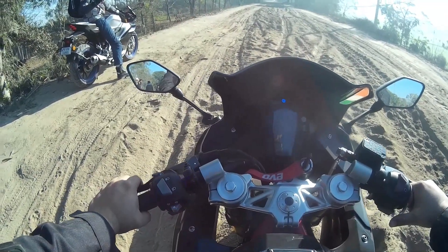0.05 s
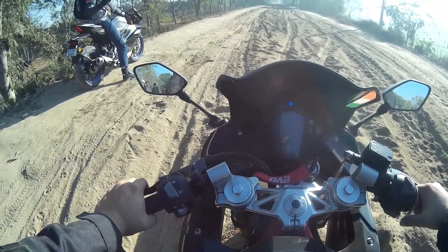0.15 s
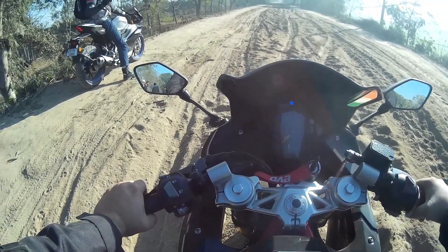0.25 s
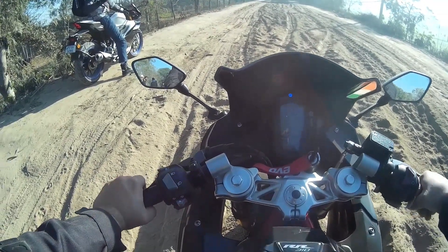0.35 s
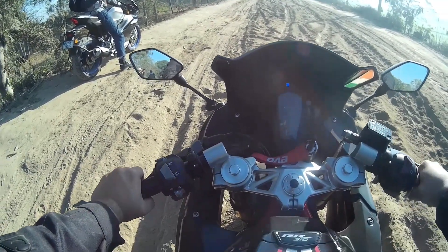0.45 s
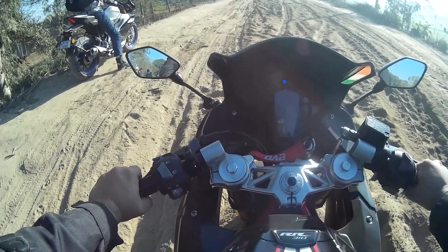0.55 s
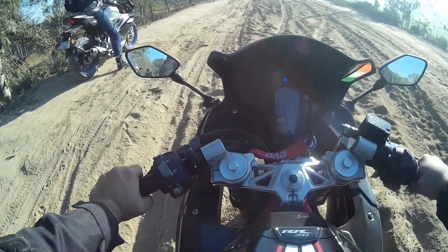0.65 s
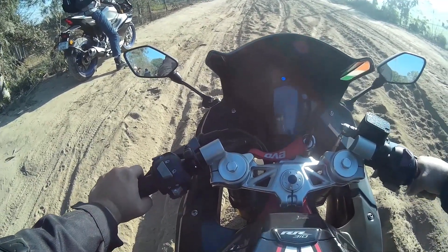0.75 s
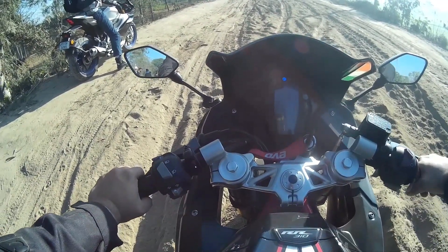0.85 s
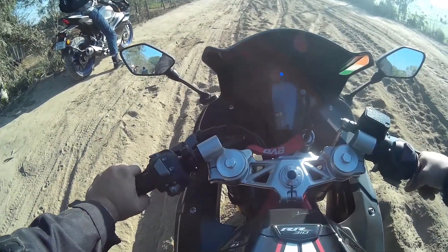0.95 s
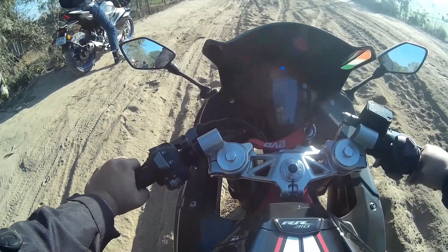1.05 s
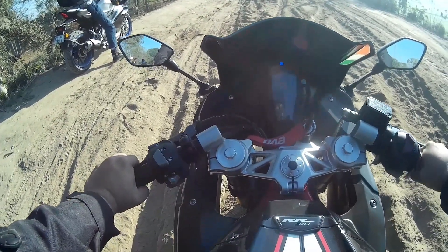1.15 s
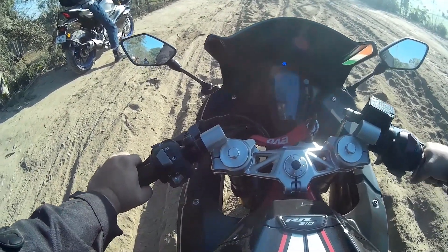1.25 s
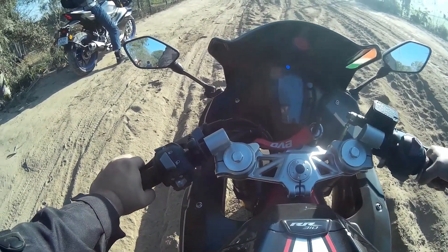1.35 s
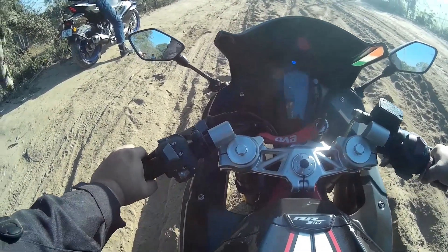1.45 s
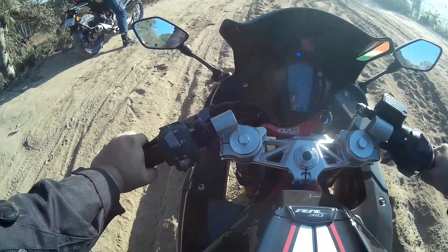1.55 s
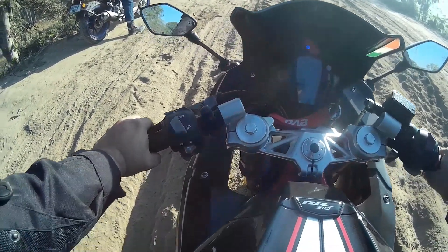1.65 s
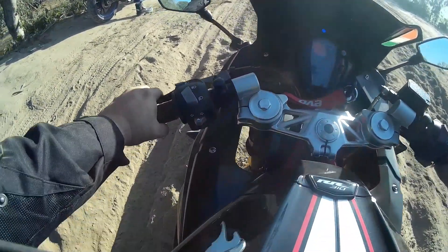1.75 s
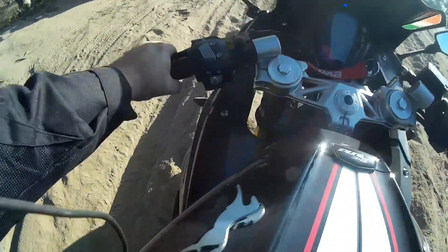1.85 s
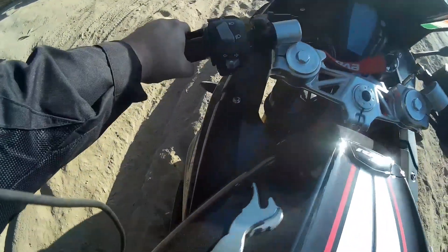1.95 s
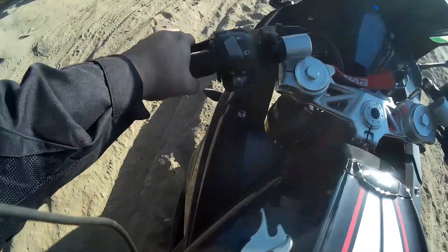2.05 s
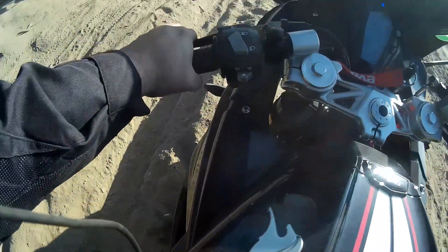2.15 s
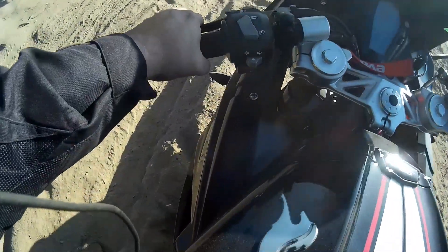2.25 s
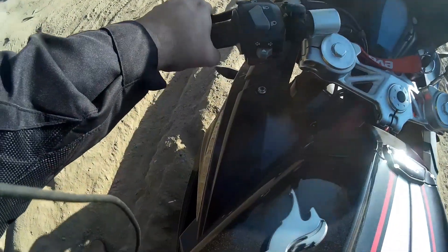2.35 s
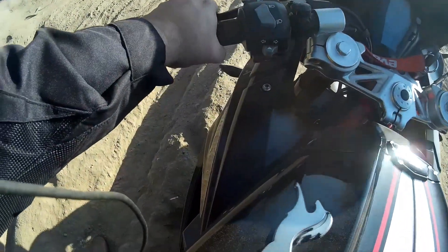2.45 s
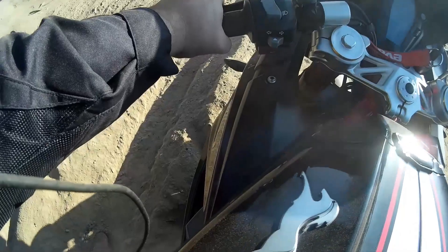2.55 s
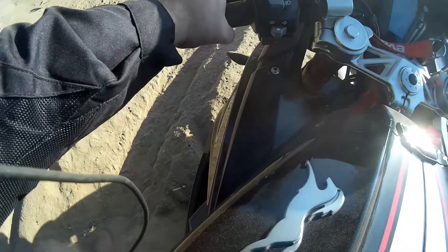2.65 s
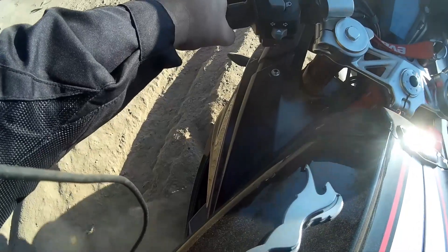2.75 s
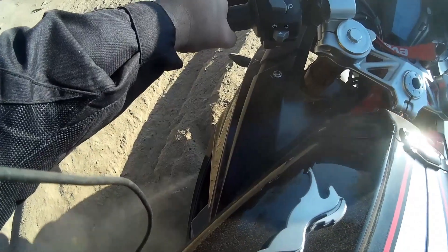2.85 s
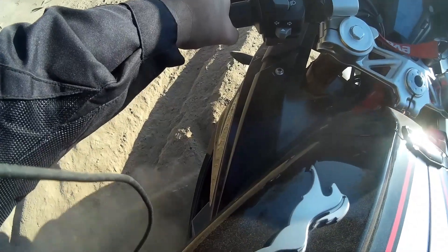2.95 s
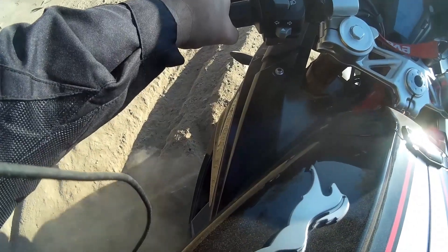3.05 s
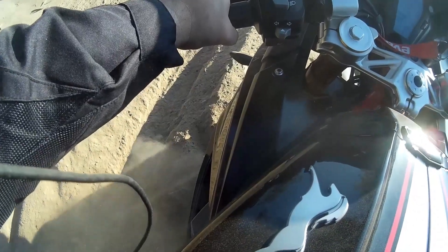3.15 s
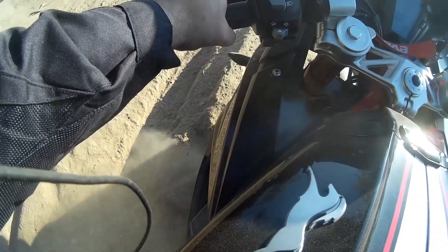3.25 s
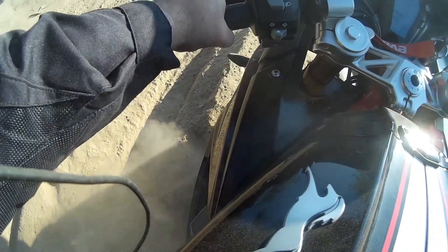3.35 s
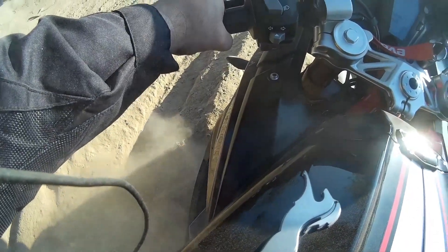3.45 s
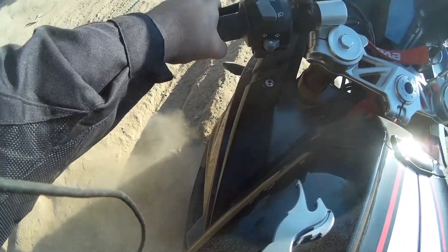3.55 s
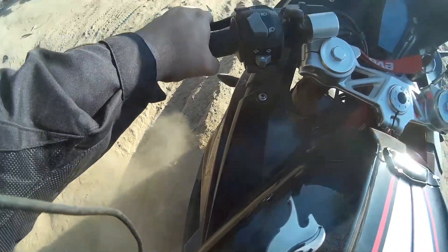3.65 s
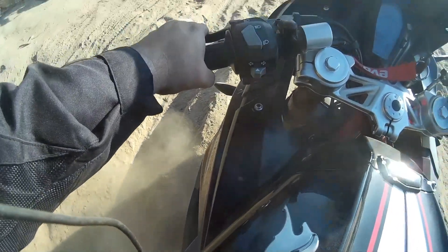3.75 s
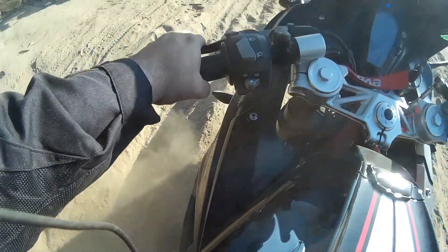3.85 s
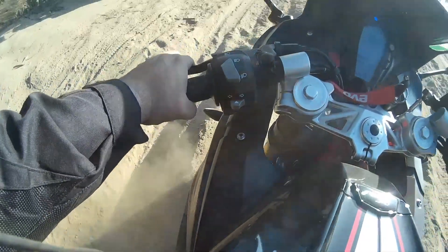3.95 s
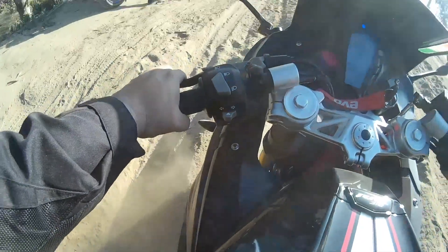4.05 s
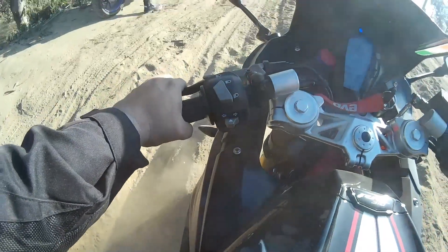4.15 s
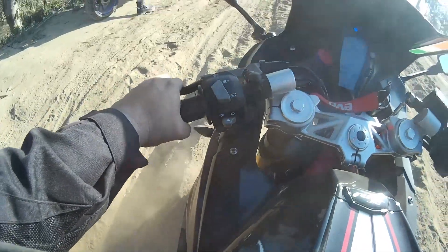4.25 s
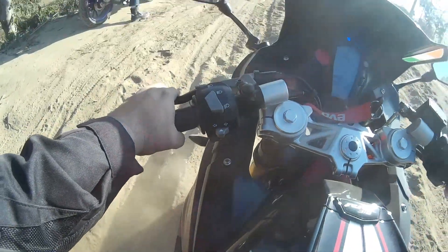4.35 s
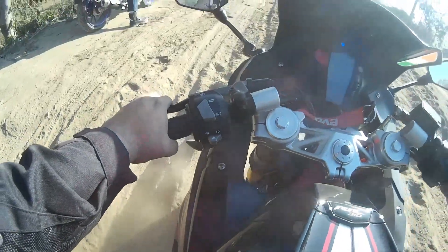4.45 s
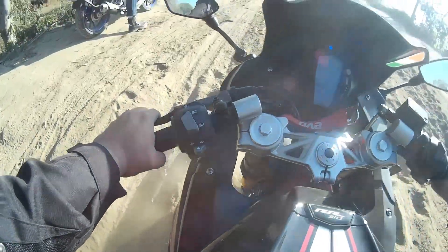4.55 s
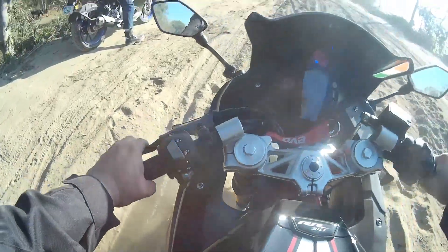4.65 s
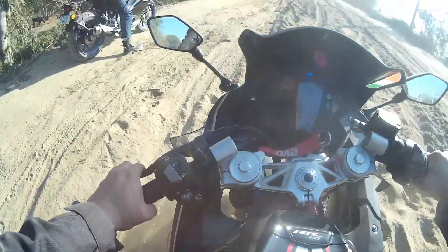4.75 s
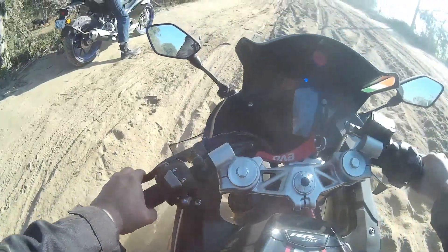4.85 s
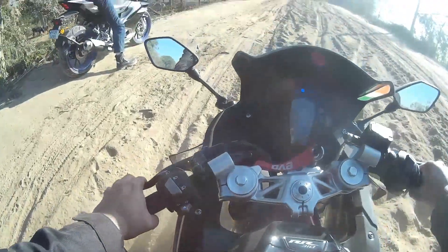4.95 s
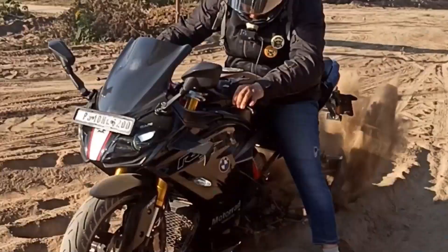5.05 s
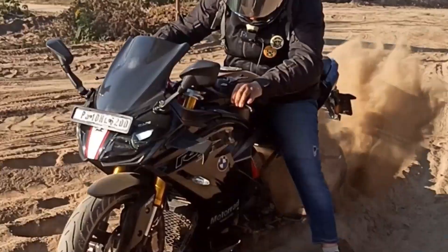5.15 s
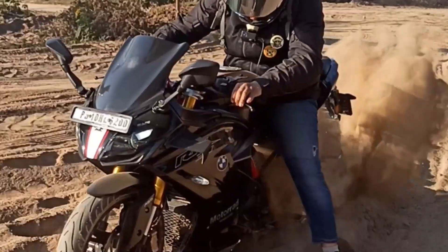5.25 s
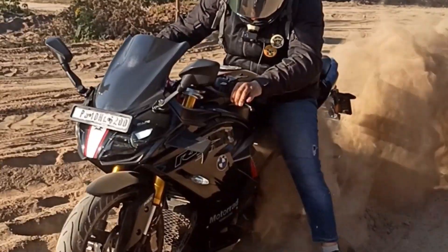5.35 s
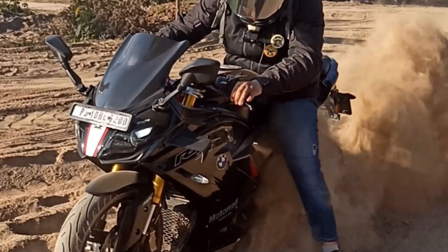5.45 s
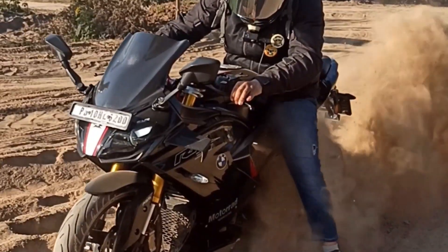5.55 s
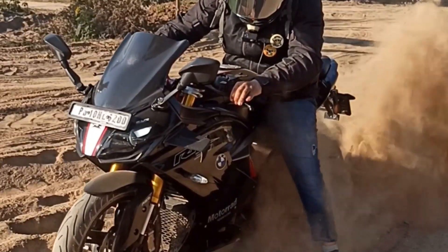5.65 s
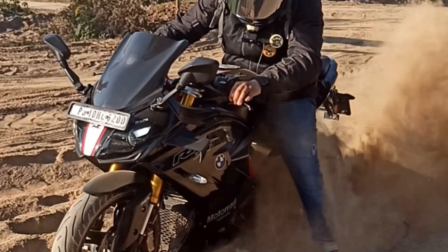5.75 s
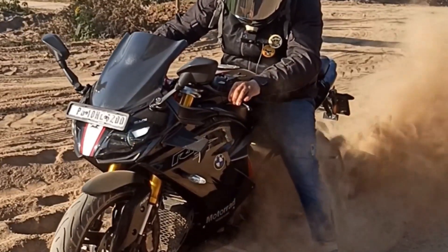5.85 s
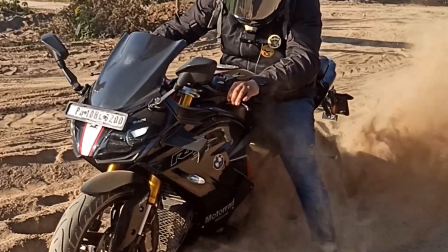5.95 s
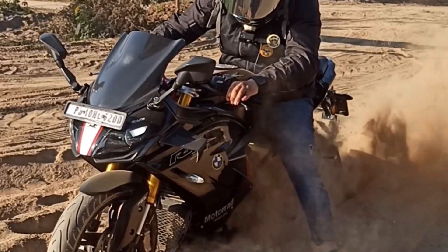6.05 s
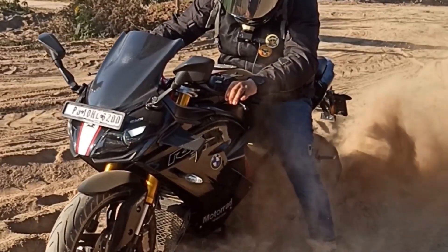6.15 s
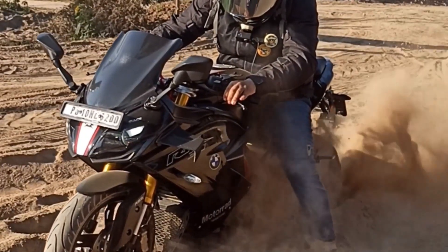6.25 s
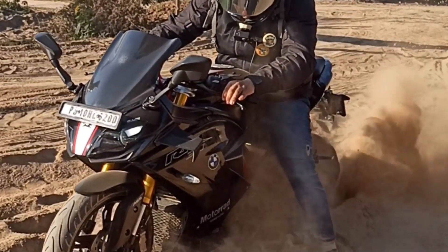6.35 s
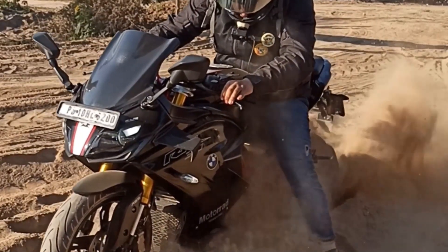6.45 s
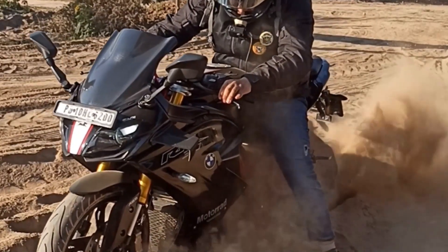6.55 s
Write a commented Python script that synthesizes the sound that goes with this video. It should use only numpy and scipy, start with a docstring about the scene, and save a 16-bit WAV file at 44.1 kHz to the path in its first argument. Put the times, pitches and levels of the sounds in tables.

```python
"""A motorcycle engine idles, muffled, then is revved in stabs; at a cut it turns open and sandy.
The muffled part is heard by a microphone in the rider's helmet. The cut goes to an open microphone in
front, which hears separate exhaust beats, valve clatter and sand sprayed by the spinning rear wheel.
One four-stroke cylinder drives it all: pulses make the beats, crank-locked patterns the knocks,
noise the rumble, rattle, ticks and loose hiss, and sine waves the frame shake, drone and gear whine."""
import sys
import numpy as np
from scipy.fft import rfft, irfft, next_fast_len
from scipy.io import wavfile
from scipy.ndimage import uniform_filter1d, map_coordinates

SR = 44100
rng = np.random.default_rng(int(sys.argv[2]) if len(sys.argv) > 2 else 0)


def to_wav(s):
    """Save 16-bit WAV."""
    ch = np.atleast_2d(s).T  # columns
    pcm = np.round(np.clip(ch, -1, 1) * 32767)  # PCM
    wavfile.write(sys.argv[1], SR, pcm.astype(np.int16))


N = 291060

# Engine speed at each microphone. Each row: time in seconds, firings per second.
HELMET_SPEED = [(0.0, 11.0), (0.2, 12.88), (0.33, 15.07), (0.52, 15.27), (0.64, 20.38), (0.78, 21.64),
                (0.9, 18.39), (1.0, 16.0), (1.1, 17.96), (1.19, 25.35), (1.3, 26.93), (1.55, 26.0),
                (1.6, 31.2), (1.71, 47.2), (1.78, 52.8), (1.85, 54.6), (1.95, 53.1), (2.09, 59.7),
                (2.2, 62.8), (2.28, 63.2), (2.34, 56.4), (2.41, 45.0), (2.48, 40.8), (2.76, 40.6),
                (3.08, 43.7), (3.37, 45.8), (3.53, 49.5), (3.64, 50.7), (3.79, 51.4), (3.9, 53.24),
                (4.0, 53.76), (4.13, 52.65), (4.3, 52.8), (4.69, 54.07), (4.86, 55.83), (5.0, 56.1)]
FRONT_SPEED = [(5.003, 58.8), (5.08, 61.5), (5.2, 63.7), (5.247, 61.9), (5.345, 48.3), (5.41, 41.2),
               (5.5, 40.66), (5.68, 40.55), (5.843, 41.86), (6.083, 44.4), (6.283, 45.7), (6.505, 49.78),
               (6.6, 50.8)]
# How hard the engine works at each microphone, before throttle stabs are added to clatter and hiss.
# Each row: time in seconds, exhaust beat level in dB, casing clatter level in dB, hiss level in dB.
HELMET_EFFORT = [(0.0, -39.5, -39.5, -51.5), (0.45, -35, -38, -50.5), (0.7, -32.5, -34, -46.5),
                 (1.1, -33.5, -37, -48.5), (1.17, -24, -32, -46), (1.3, -31.5, -31.5, -42),
                 (1.55, -30.5, -32.5, -44), (1.63, -17, -25, -39), (1.8, -24.5, -25, -41),
                 (1.93, -22.5, -26, -44.5), (2.1, -20.5, -26.5, -42), (2.23, -19.5, -26, -43.5),
                 (2.33, -27, -27.5, -44.5), (2.38, -42.5, -31, -47.5), (2.44, -29, -34.5, -47),
                 (2.46, -30.5, -26.5, -46.5), (2.56, -27.5, -25, -43), (3.39, -25, -26, -44),
                 (3.6, -24, -24.5, -42), (3.78, -22, -24, -40.5), (3.92, -23.5, -26, -42.5),
                 (4.13, -27.5, -30, -46), (4.61, -27, -28.5, -44), (4.87, -29, -34, -48),
                 (5.0, -26.5, -31, -43.5)]
FRONT_EFFORT = [(5.003, -24.5, -29, -27.5), (5.089, -17, -30.5, -28), (5.2, -22.5, -29, -27),
                (5.25, -24, -29, -26.5), (5.3, -27, -34, -31.5), (5.375, -31, -34, -29.5),
                (5.42, -20, -28, -29), (5.7, -21, -29.5, -29), (6.04, -19, -28.5, -30),
                (6.35, -18, -29.5, -29.5), (6.6, -16.5, -30.5, -27.5)]
# Stabs of the throttle that make the metal bark. Each row: time in seconds, rise in dB.
THROTTLE_STABS = [(0.625, 3), (1.14, 4.5), (1.668, 8.5), (4.0, 3)]
# Tone colours of exhaust beat, frame boom, casing clatter and hiss at each microphone.
# Each row: frequency in Hz, relative level in dB.
HELMET_BEAT_COLOUR = [(20, -28.5), (42, -10), (55, 0), (80, -9.5), (135, -1.5), (185, -5.5), (260, -10.5),
                      (600, -55.5)]
HELMET_BOOM_COLOUR = [(180, -52.5), (250, -1.5), (330, -3), (365, -2.5), (405, 1), (430, -1), (460, -8.5),
                      (510, -4), (560, -13), (620, -18.5), (800, -49.5)]
HELMET_CASING_COLOUR = [(450, -40.5), (620, -3), (800, -7.5), (950, -8.5), (1100, -4), (1300, 0.5),
                        (1480, -5), (1600, -8), (1750, -8.5), (1900, -21), (2100, -31), (3000, -38)]
HELMET_HISS_COLOUR = [(1060, -28.5), (1800, -16), (1900, -3), (2540, -6.5), (2860, -12), (3490, -14),
                      (4750, -18), (5790, -24), (8180, -23.5), (11400, -32.5), (15700, -49.5)]
FRONT_BEAT_COLOUR = [(35, -49), (55, -32), (80, -8.5), (165, 2), (210, -1.5), (250, -9.5), (330, -23.5),
                     (500, -32)]
FRONT_BOOM_COLOUR = [(300, -15.5), (400, -10.5), (450, -6.5), (600, -3), (660, -8), (800, -13.5)]
FRONT_CASING_COLOUR = [(600, -22.5), (720, -3), (850, 2.5), (1000, -9), (1230, -1.5), (1450, -24.5),
                       (1900, -18.5), (3000, -39)]
FRONT_HISS_COLOUR = [(900, -6.5), (1500, -1.5), (2800, -9), (3400, -8.5), (4450, -8.5), (4610, -2),
                     (4780, -14), (5300, -15), (6100, -11), (6500, -7), (7550, -9), (8500, -21.5),
                     (8900, -37), (11500, -35), (12000, -28.5), (15700, -33)]
# How the frame passes the crank shake and the piston drone to each microphone.
# Each row: frequency in Hz, level in dB when the beat is at LOADED_DB.
HELMET_SHAKE = [(22, -38), (40, -54), (52, -35), (62, -31), (82, -23), (100, -22), (108, -22), (126, -26)]
HELMET_DRONE = [(44, -50), (60, -48), (86, -29), (108, -35), (125, -40), (150, -24), (164, -14.5),
                (175, -13), (186, -16), (196, -23), (204, -15), (214, -13), (226, -14.5), (240, -20.5),
                (253, -20.5)]
FRONT_SHAKE = [(80, -27.5), (90, -28), (100, -26.5), (116, -29), (128, -30)]
FRONT_DRONE = [(162, -23.5), (168, -21), (178, -27), (190, -35), (200, -24.5), (212, -14), (232, -13),
               (246, -16.5), (255, -24)]
# Boom over the clatter. The one row: dB at LOADED_RATE, dB per extra firing a second.
HELMET_BOOM_MIX = (5.6, 0.2)
FRONT_BOOM_MIX = (1.1, .01)
# Narrow bands in which the covers of the slow engine ring. Each row: frequency in Hz, relative level in dB.
COVER_RING = [(1100, -35.5), (1330, 0.5), (1500, -7), (1720, 1), (1800, -3), (1950, -20), (2150, -7.5),
              (2500, -36)]
# Resonances of the gear case that let the whine through. Each row: frequency in Hz, gain in dB.
GEAR_CASE = [(3300, -30), (3720, 0), (3850, -4), (4050, -13), (4300, -18), (4600, -4), (4900, -30)]
# Colour of the slow engine's valve ticks. Each row: frequency in Hz, relative level in dB.
VALVE_TICK = [(1900, -46), (2500, 12), (3600, 4.5), (4400, 8.5), (4900, -16), (6000, -31), (7600, -7),
              (9000, -32), (13000, -40)]

STAB_RISE_S, STAB_FALL_S = 0.017, 0.058  # time constants of a stab
STAB_LOOSENS = .05  # extra share of loose noise per dB of stab
LOADED_DB, LOADED_RATE = -25, 45  # reference beat level in dB and speed in firings per second
SHAKE_FOLLOWS, DRONE_FOLLOWS = 0.62, 0.36  # dB per dB of the beat
DRONE_LAG_S = 0.074  # the drone answers the beat late
COVER_RING_DB = -3  # relative to the casing clatter
GEAR_ORDER = 92  # whine cycles per firing
CUT_S, CUT_FADE_S = 5.003, .001
TOP_HZ = 15750


def amp(db):
    """Turn a level in dB into a gain."""
    return 10 ** (np.asarray(db) / 20)


def unit(x):
    """Scale a sound to an rms (average strength) of 1."""
    return x / np.sqrt(np.mean(x ** 2) + 1e-20)


def wobble(rate):
    """Draw a smooth random curve with so many knots a second."""
    return map_coordinates(rng.standard_normal(int(N * rate / SR) + 4), [np.arange(N) * rate / SR])


def coloured(x, points):
    """Filter a sound to the drawn colour, with its response only after each input (minimum phase)."""
    size = 2 * next_fast_len(N // 2 + SR // 4)
    hz = np.fft.rfftfreq(size, 1 / SR)
    point_hz, point_db = np.transpose(points)
    gain_db = np.interp(np.log(hz + 1), np.log(point_hz + 1), point_db, right=-90)
    # folding the cepstrum forward in time makes the filter causal
    cepstrum = irfft(np.log(amp(gain_db)), size)
    cepstrum[1:size // 2] *= 2
    cepstrum[size // 2 + 1:] = 0
    return irfft(rfft(x, size) * np.exp(rfft(cepstrum)), size)[:N]


def columns(rows):
    """Draw each column after the time as a curve with one value per sample."""
    s, *cols = np.transpose(rows)
    return [np.interp(np.arange(N) / SR, s, c) for c in cols]


def stabs():
    """Rise quickly into each throttle stab and fall more slowly after it, in dB."""
    t = np.arange(N) / SR
    return sum(db * np.exp(np.minimum((t - s) / STAB_RISE_S, (s - t) / STAB_FALL_S))
               for s, db in THROTTLE_STABS)


def levels(speed, effort, shake, drone, boom_mix):
    """Work out the firing rate and the level of every layer from engine speed and effort."""
    rate, = columns(speed)
    beat_db, casing_db, hiss_db = columns(effort)
    casing_db, hiss_db = casing_db + stabs(), hiss_db + stabs()
    late_db = np.interp(np.arange(N) - DRONE_LAG_S * SR, np.arange(N), beat_db)
    crank_hz = 2 * rate
    shake_db = np.interp(crank_hz, *np.transpose(shake)) + SHAKE_FOLLOWS * (beat_db - LOADED_DB)
    drone_db = np.interp(2 * crank_hz, *np.transpose(drone)) + DRONE_FOLLOWS * (late_db - LOADED_DB)
    boom_db = casing_db + boom_mix[0] + boom_mix[1] * (rate - LOADED_RATE)
    return rate, shake_db, drone_db, beat_db, boom_db, casing_db, hiss_db


def firing_pulses(cycles, scatter_db):
    """Place one band-limited pulse of uneven strength at each firing."""
    whole = np.arange(np.ceil(cycles[0]), cycles[-1])
    at = np.interp(whole, cycles, np.arange(N))
    near = np.floor(at)[:, None] + np.arange(-7, 9)
    gap = near - at[:, None]
    size = amp(scatter_db * rng.standard_normal((len(at), 1)))
    # a windowed sinc lets a pulse fall between two samples
    shape = size * np.sinc(gap) * np.cos(gap * np.pi / 16) ** 2
    return np.bincount(np.clip(near, 0, N - 1).astype(int).ravel(), shape.ravel(), N)


def exhaust_beats(cycles, rate, colour):
    """Shape each firing pulse into a beat; dividing by root speed makes rarer beats stronger."""
    return -unit(coloured(firing_pulses(cycles, 0.39) / np.sqrt(rate), colour))


def in_step(exhaust, cycles, order):
    """Find one multiple of the firing rate in the beats: its complex wave, and the same at rms 1."""
    turn = np.exp(2j * np.pi * order * cycles)
    mean = uniform_filter1d(exhaust / turn, size=SR // 6)
    return 2 * turn * mean, np.sqrt(2) * turn * mean / np.abs(mean)


def beats_and_shake(exhaust, rumble, cycles, beat_db, shake_db, drone_db, octave_db):
    """Swap two orders of the beats for ones that follow the crank's shaking forces instead."""
    # the crank turns twice a firing cycle; the piston's force peaks at twice that
    second, shake = in_step(exhaust, cycles, 2)
    fourth, drone = in_step(exhaust, cycles, 4)
    _, octave = in_step(exhaust, cycles, 8)
    orders = amp(shake_db) * shake + amp(drone_db) * (drone + amp(octave_db) * octave)
    return amp(beat_db) * (exhaust - np.real(second + fourth) + rumble) + np.real(orders)


def pipe_rumble(colour, slow):
    """Let gas rumble on in the pipe between beats, as noise in the exhaust's colour."""
    return (0.49 + slow) * amp(-11) * unit(coloured(rng.standard_normal(N), colour))


def throb(cycles, place, sharp):
    """Swell once a firing cycle, at a place (0-1) in the cycle."""
    return np.exp(sharp * (np.cos(2 * np.pi * (cycles - place)) - 1))


def repeating(cycles, spread, drift, even_db, uneven_db, count=200):
    """Knock in step with the crank: a sum of firing-rate orders whose phases wander slowly."""
    knots = 4 * N // SR + 4  # about four fresh patterns a second, blended smoothly
    order = np.arange(count + 1)
    # spread in radians: small gives one blow, large spreads the sound over the cycle
    phase = spread * rng.standard_normal(count + 1) + drift * rng.standard_normal((knots, count + 1))
    size_db = uneven_db * rng.standard_normal((knots, count + 1)) + even_db * (order % 2 == 0)
    size = amp(size_db) * (order > 0)
    table = irfft(size * np.exp(1j * phase), 4 * count)
    where = [np.linspace(1, knots - 2, N), cycles % 1 * 4 * count]
    return map_coordinates(table, where, mode="grid-wrap")


def metal_or_hiss(knock, noise, colour, loose, slow):
    """Blend knocks locked to the crank with free noise; a slow or stabbed engine is looser."""
    locked = unit(coloured(knock, colour))
    free = unit(coloured(noise, colour))
    share = np.minimum(loose + slow * (.85 - loose) + STAB_LOOSENS * np.abs(stabs()), .85)
    return np.sqrt(1 - share) * locked + np.sqrt(share) * free


def ringing_covers(rattle, slow):
    """Ring the slow engine's covers by passing throbbing noise through narrow bands."""
    return slow * unit(coloured(rattle * rng.standard_normal(N), COVER_RING))


def gear_whine(cycles, whine_db):
    """Whine as meshing gear teeth do: an unsteady sine at a high order, through the gear case."""
    level = amp(whine_db + 2.6 * wobble(25))
    tone = np.sin(2 * np.pi * GEAR_ORDER * cycles + 2.6 * wobble(80))
    return coloured(level * tone, GEAR_CASE)


def sudden_bursts(cycles, rate, place, decay_s):
    """Start abruptly at a place (0-1) in each cycle and die away with time constant decay_s."""
    return np.exp(-((cycles - place) % 1) / (rate * decay_s))


def valve_ticks(cycles, rate, place, slow):
    """Tick twice a cycle with short bursts of bright noise while the engine is slow."""
    bursts = sudden_bursts(cycles, rate, place - .05, 0.016)
    bursts = bursts + 0.42 * sudden_bursts(cycles, rate, place + 0.41, 0.013)
    return amp(0.5) * slow * unit(coloured(bursts * rng.standard_normal(N), VALVE_TICK))


def engine(controls, colours, firing_s, place, spread, drift, even_db, octave_db, whine_db,
           flutter_db, casing_loose, uneven_db):
    """Add up every sound of the engine, all timed by one count of firing cycles."""
    rate, shake_db, drone_db, beat_db, boom_db, casing_db, hiss_db = controls
    beat, boom, casing, hiss = colours
    cycles = np.cumsum(rate) / SR
    # line up one firing with firing_s; 1000 keeps the count positive
    cycles = cycles - np.interp(firing_s * SR, np.arange(N), cycles) + 1000
    slow = np.interp(rate, [17, 38], [1, 0])  # 1 for a slow engine, 0 for a fast one
    exhaust = exhaust_beats(cycles, rate, beat)
    rumble = pipe_rumble(beat, slow)
    layers = beats_and_shake(exhaust, rumble, cycles, beat_db, shake_db, drone_db, octave_db)

    # valve closing and combustion each rattle the metal
    rattle = .5 + throb(cycles, place, 0.56) + .5 * throb(cycles, place + .5, 0.96)
    flutter = amp(flutter_db * (wobble(11) + wobble(22) + 2.0 * wobble(70)))
    # each row: level, colour, share of loose noise, phase spread in radians
    for db, colour, loose, blur in (
            (boom_db, boom, .05, spread),
            (casing_db, casing, casing_loose, spread),
            (hiss_db, hiss, .65, np.pi)):
        knock = repeating(cycles - place, blur, drift, even_db, uneven_db) * np.sqrt(rate)
        noise = rattle * flutter * rng.standard_normal(N)
        layers = layers + amp(db) * metal_or_hiss(knock, noise, colour, loose, slow)

    layers = layers + amp(casing_db + COVER_RING_DB) * ringing_covers(rattle, slow)
    whine = gear_whine(cycles, whine_db)  # whine_db is relative to the hiss level
    return layers + amp(hiss_db) * (whine + valve_ticks(cycles, rate, place, slow))


def scene():
    """Play the helmet microphone until the cut and the open front one after it."""
    helmet = engine(
        levels(HELMET_SPEED, HELMET_EFFORT, HELMET_SHAKE, HELMET_DRONE, HELMET_BOOM_MIX),
        (HELMET_BEAT_COLOUR, HELMET_BOOM_COLOUR, HELMET_CASING_COLOUR, HELMET_HISS_COLOUR),
        firing_s=.234, place=.22, spread=3.28, drift=0.57, even_db=3.4, octave_db=-16.5,
        whine_db=-30, flutter_db=0.61, casing_loose=.2, uneven_db=3)
    front = engine(
        levels(FRONT_SPEED, FRONT_EFFORT, FRONT_SHAKE, FRONT_DRONE, FRONT_BOOM_MIX),
        (FRONT_BEAT_COLOUR, FRONT_BOOM_COLOUR, FRONT_CASING_COLOUR, FRONT_HISS_COLOUR),
        firing_s=5.6185, place=.3, spread=.55, drift=.4, even_db=0.086, octave_db=-42,
        whine_db=-9, flutter_db=0.28, casing_loose=.08, uneven_db=1.5)
    after = np.clip((np.arange(N) / SR - CUT_S) / CUT_FADE_S, 0, 1)
    return (after * front + (1 - after) * helmet)[None]


def record(dry):
    """Round off the highest peaks and keep nothing from the band limit up."""
    soft = dry / (1 + np.abs(dry / .75) ** 6) ** (1 / 6)
    keep = np.fft.rfftfreq(2 * N, 1 / SR) < TOP_HZ
    return irfft(rfft(soft, 2 * N) * keep, 2 * N)[:, :N]


dry = scene()
out = record(dry)
to_wav(out)
```